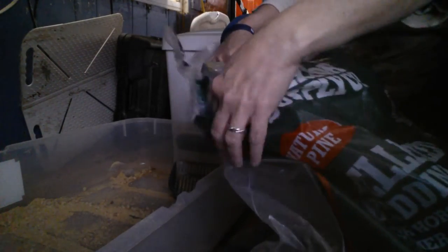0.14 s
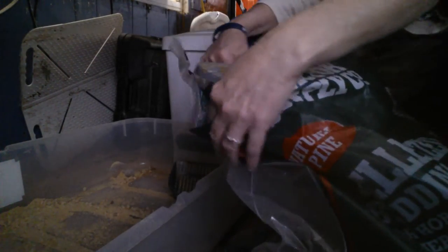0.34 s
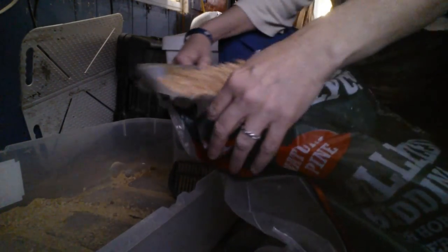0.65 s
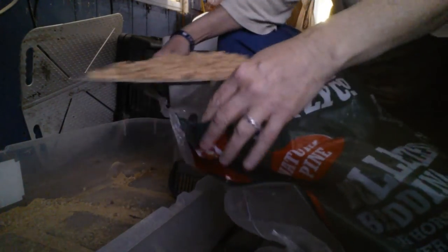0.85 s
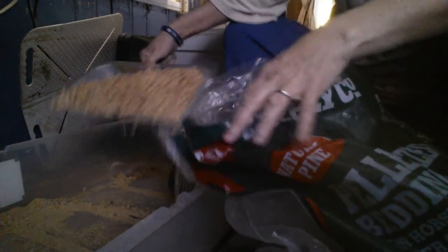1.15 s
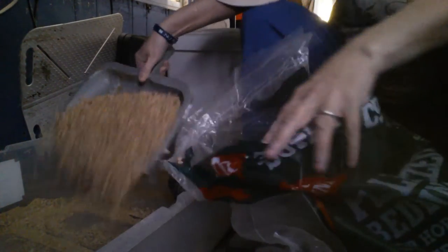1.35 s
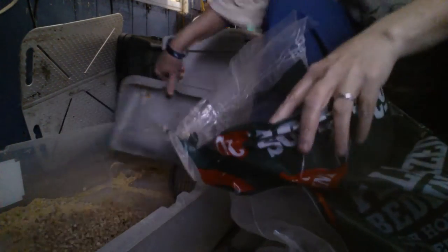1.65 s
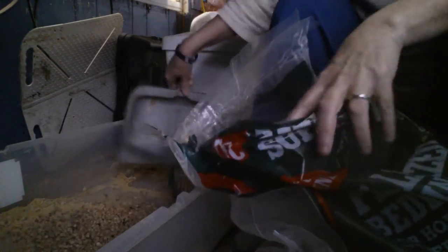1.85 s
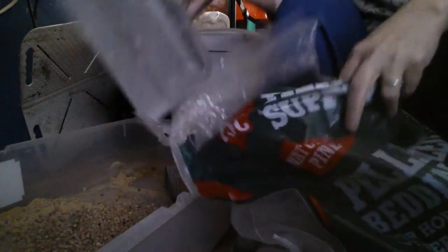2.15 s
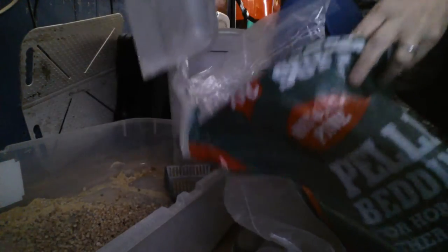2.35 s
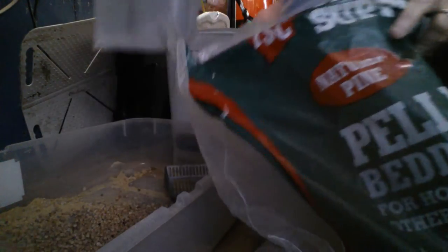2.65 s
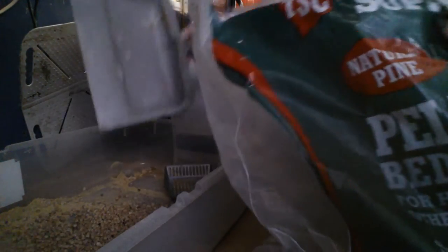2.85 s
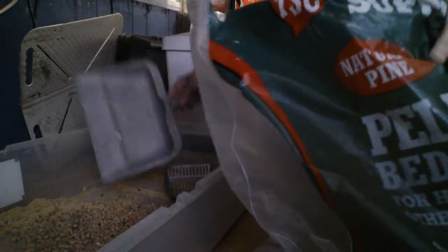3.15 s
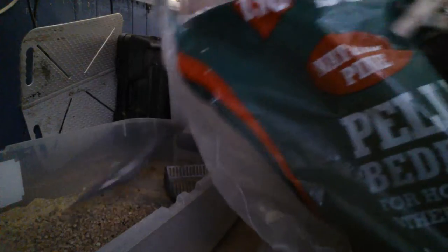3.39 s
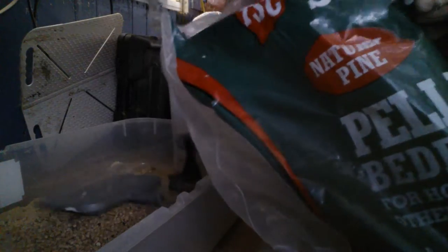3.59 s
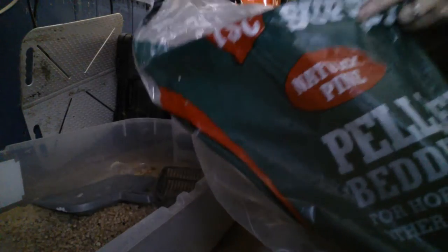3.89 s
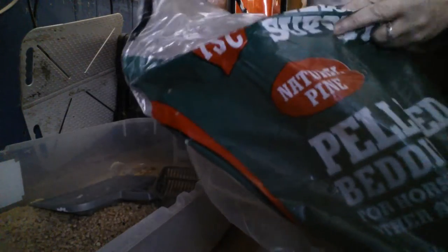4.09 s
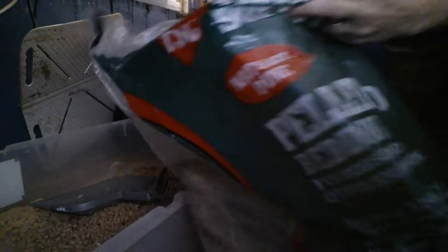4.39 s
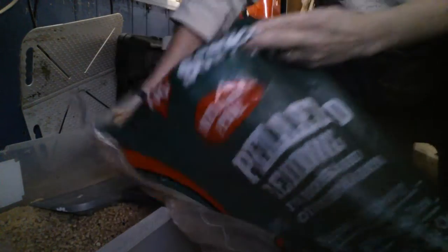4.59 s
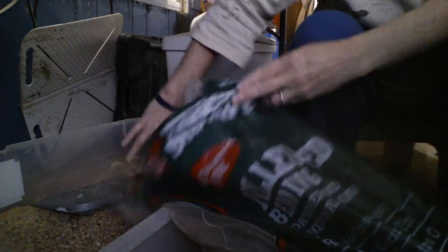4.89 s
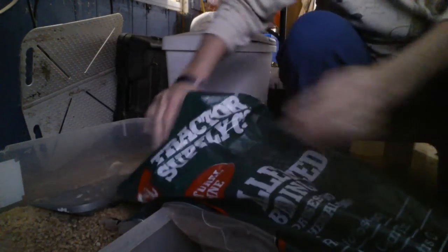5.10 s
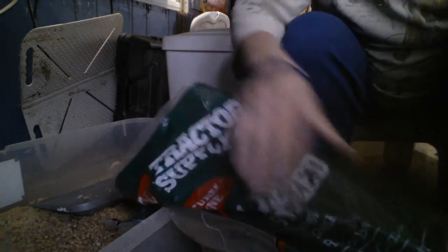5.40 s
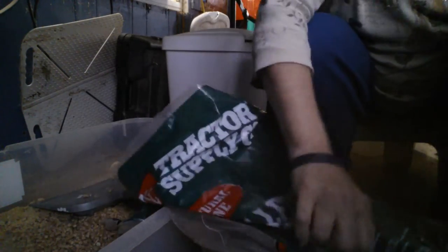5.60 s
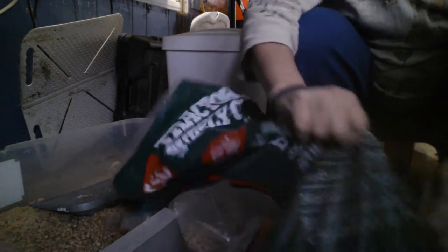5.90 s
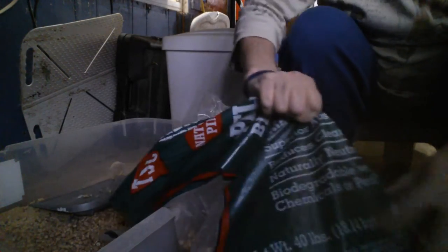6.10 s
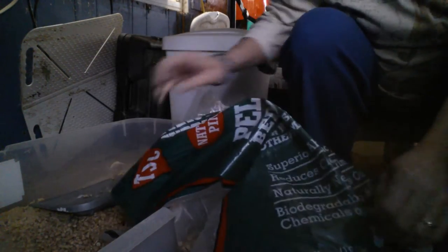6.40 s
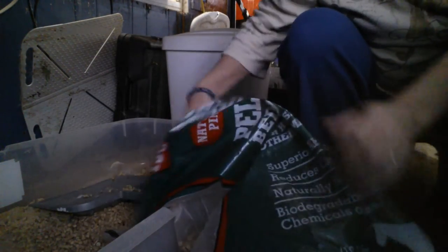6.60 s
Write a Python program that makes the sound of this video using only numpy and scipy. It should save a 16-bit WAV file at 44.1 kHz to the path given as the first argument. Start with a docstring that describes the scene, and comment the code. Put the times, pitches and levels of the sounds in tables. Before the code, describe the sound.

Stiff plastic crinkles with low shifting weight beneath it. Quick scoop clacks lead to a dense, gritty burst of wood pellets striking each other and ringing a plastic tub. After softer rustling, a thump and a cluster of bumps land in the tub; the bag then swishes and crackles strongly, lets out a smaller rush of pellets, and is scrunched in sharp bursts. Close stereo pickup indoors, short dry reverberation, a brighter right side, low quiet room hum.

```python
"""Wood pellets are scooped from a crinkling plastic bag and poured into a plastic bin, close up in a small room.
The bag crinkles while the scoop digs; the scoop clacks, and a scoopful rattles into the ringing bin.
The bag is then gripped, lifted and swung over the bin, where the scoop drops; it is tipped, spills and is crumpled.
Filtered random impulses make bag and pellets, decaying sines the bin, and filtered noise the room and its drone.
The two microphone ports resonate at different pitches, so the highest fizz sits on the right."""
import sys
import numpy as np
from scipy import signal
from scipy.fft import rfft, irfft
from scipy.io import wavfile
from scipy.ndimage import uniform_filter1d

SR = 44100
rng = np.random.default_rng(int(sys.argv[2]) if len(sys.argv) > 2 else 0)


def int16_out(signal):
    """Quantize to a 16-bit WAV file."""
    q = np.round(np.clip(np.atleast_2d(signal).T, -1, 1) * 32767)
    wavfile.write(sys.argv[1], SR, q.astype(np.int16))


N = 297498
TIME = np.arange(N) / SR


# each grip, lift or push of the bag; holds count from the start, levels are before the gains in bag():
# start t/s, hold t/s, crinkle of small creases level/dB, rustle of wide folds level/dB, rumble of the load level/dB
BAG_STROKES = [ (-0.02, 0.2, -43.5, -39.5, -45), (0.18, 0.13, -35, -37.5, -43),
               (0.39, 0.25, -33.5, -35.5, -40.5), (0.575, 0.12, -36, -30, -33.5),
               (0.71, 0.27, -36.5, -34.5, -39), (1.03, 0.069, -31.5, -33, -40),
               (1.23, 0.24, -37.5, -42, -39.5), (1.78, 0.089, -45, -43, -51), (2.25, 0.14, -42, -47, -56),
               (2.42, .15, -39.5, -44.5, -48), (2.66, 0.12, -40.5, -43.5, -51),
               (2.75, 0.09, -34.5, -38, -41.5), (2.88, 0.39, -44.5, -39, -43.5),
               (3.31, 0.044, -34, -32, -36), (3.455, 0.099, -33.5, -36.5, -44),
               (3.52, 0.38, -31, -35.5, -42), (3.96, 0.047, -36, -41.5, -35),
               (4.08, 0.28, -43.5, -37.5, -36.5), (4.27, 0.12, -30.5, -26, -33.5),
               (4.35, .16, -22.5, -21.5, -30), (4.555, 0.18, -22, -22.5, -30),
               (4.74, 0.11, -31, -29.5, -39.5), (4.9, 0.18, -39, -40, -43), (5.31, 0.12, -35.5, -37, -42),
               (5.47, 0.19, -34.5, -45.5, -43), (5.63, 0.14, -30.5, -44, -43.5),
               (5.735, 0.14, -25.5, -38.5, -35.5), (5.85, 0.22, -27.5, -30.5, -35),
               (6.07, .13, -40, -36, -39), (6.23, 0.061, -30, -34.5, -40), (6.27, 0.1, -25.5, -34, -36),
               (6.39, 0.032, -40, -34, -37), (6.62, .08, -35, -44, -48), (6.69, .06, -28.5, -30.5, -38)]
# the bag between strokes: crinkle level/dB, rustle level/dB, rumble level/dB, before the same gains
BAG_AT_REST = (-48.5, -49, -53)


def handling():
    """Amplitude modulation: how hard creases, folds and load are worked over time."""
    return [envelope(BAG_STROKES, axis=2 + k, attack_s=0.02, fade_db_per_s=162, rest_db=rest)
            for k, rest in enumerate(BAG_AT_REST)]


# spectrum of a small crease: f/Hz, level/dB
CREASE_SPECTRUM = [(200, -32), (700, -7.5), (1500, -6.5), (3000, 2.5), (6000, 1.5), (10000, -2),
                   (16000, -2.5)]
# spectrum of a wide fold: f/Hz, level/dB
FOLD_SPECTRUM = [(120, -7), (260, 2.5), (400, -7.5), (520, 0.5), (700, 2.5), (950, -6.5), (1500, -3),
                 (2500, -1.5), (5000, -9.5), (12000, -15.5)]
# spectrum of the shifting load of pellets: f/Hz, level/dB
LOAD_SPECTRUM = [(30, -9.5), (55, -9.5), (85, -4), (130, -1), (170, -3.5), (230, -2), (330, -17.5),
                 (600, -21), (2000, -82)]


def bag(crease_db=0, fold_db=-3, load_db=2):
    """Crackling noise: small creases crackle, wide folds rustle and the load shifts with a low rumble."""
    creases = grains(per_s=1500, spread_db=3.3, clump_db=2.5, spectrum=CREASE_SPECTRUM,
                     decay_s=0.0073, direct=0.24)
    folds = grains(per_s=500, spread_db=4.5, clump_db=2.5, spectrum=FOLD_SPECTRUM,
                   decay_s=0.0098, direct=0.47, tint_db=6.0)
    load = grains(per_s=130, spread_db=5.5, clump_db=1.0, spectrum=LOAD_SPECTRUM,
                  decay_s=0.018, direct=0.46, size=4096)
    crinkle, rustle, rumble = handling()
    return amp(crease_db) * crinkle * creases + amp(fold_db) * rustle * folds + amp(load_db) * rumble * load


# the loudest creases snapping; levels are before the offsets in cracks() and snaps():
# t/s, overall level/dB, body level/dB, crispness level/dB
LOUD_SNAPS = [(0.05, -21.5, -6, -9), (0.185, -21, -20, -3), (0.202, -17, -28, 3), (0.315, -28, -11, -20),
              (0.597, -13.5, -37, -3), (0.621, -19, -10, -1), (0.703, -19.5, -18, -10),
              (0.906, -11.5, -22, -3.5), (1.036, -16, -13, -13), (1.051, -8.5, -17.5, -4),
              (1.308, -20, -14, -12), (1.487, -9, -16, -8), (1.796, -17.5, -24, 3), (1.903, -25, -23, -42),
              (2.262, -24, -23, -2), (2.382, -27.5, -8, -4), (2.439, -25, -9, 1.5),
              (2.565, -21.5, -22, -14), (2.667, -23, -12.5, -4), (2.838, -19, -15, -8),
              (2.893, -19.5, -6.5, -6), (3.013, -25, -16, -30), (3.048, -21.5, -16, -6),
              (3.134, -26, -15, -12), (3.195, -27.5, -6, -33), (3.32, -24, -3, -22), (3.451, -13, -12, 0),
              (3.509, -16.5, -6, -2), (3.532, -9, -8, -11), (3.582, -6.5, -13, -6), (3.669, -13, -36, -4.5),
              (3.885, -16, -32, -12), (3.918, -12.5, -18, -7), (3.967, -19.5, -19, -3),
              (4.095, -23.5, -23, -3), (4.293, -28, -20, -1), (4.893, -7, -14.5, -8.5),
              (4.911, -15, -22, -21), (4.941, -7, -12, -2), (4.953, -10.5, -19, -5.5), (5.098, -15, -20, 0),
              (5.117, -14, -18, 0), (5.165, -16.5, -10, -23), (5.205, -17, -17, -28), (5.396, -15, -13, -8),
              (5.425, -19.5, -16.5, -11), (5.509, -21, -12, -4), (5.561, -19.5, -34, 4),
              (5.655, -15, -16, 1), (5.777, -16, -22, 6), (5.79, -15.5, -28, 7), (5.826, -13, -27, 5),
              (5.937, -14, -16, 3), (5.972, -11, -16, -5), (6.105, -13, -31, -5), (6.154, -12, -16, -6),
              (6.17, -13, -11, -3), (6.388, -16.5, -28, -3), (6.53, -29, 1, -2), (6.72, -14, -11, -18)]


def snap_rows(per_s=12, tint_db=3, snap_s=0.014):
    """Poisson process: small random snaps, stronger with the crinkling, join the loud ones."""
    crinkle_db = 20 * np.log10(handling()[0])
    growth = 0.69  # dB of snap for each dB of crinkle
    at = np.flatnonzero(rng.random(N) < per_s / SR)
    strays = []
    for i in at:
        a, b, c = rng.standard_normal(3)
        level = growth * crinkle_db[i] - 4.5 + 4 * a
        body, crisp = -21.5 + tint_db * b, -18 + tint_db * c
        strays.append((i / SR, level, body, crisp))
    return [(*row, snap_s) for row in list(LOUD_SNAPS) + strays]


def snaps():
    """Buckling: a crease gives way in a run of slips that holds, then stops."""
    return cracks(snap_rows(), gain_db=-9.0, first_share=0.12, sustain=1.5)


# pellets running into the bin; holds count from the start, levels are before the gains in pellets():
# start t/s, hold t/s, rattle level/dB, bin ringing level/dB
# rows: a trickle, the whole scoopful, stragglers; then a spill from the bag, the rest of it, a trickle
PELLET_POURS = [(1.3, 0.49, -28, -38.5), (1.524, 0.2, -16, -27.5), (1.78, 0.044, -35, -37),
                (4.893, .05, -23.5, -35), (4.94, 0.18, -19, -34.5), (5.12, 0.17, -27.5, -45.5)]
# spectrum of pellets striking each other: f/Hz, level/dB
PELLET_SPECTRUM = [(200, -45), (420, -23), (800, -11), (1200, -3.5), (1750, -2.5), (2300, -0.5), (4000, 2),
                   (7000, -1), (10000, -6), (16000, -7)]


def pellets(rattle_db=-3, ring_db=-1, count=6):
    """Granular impact noise: pellets strike each other and their landings excite the bin's modes."""
    rattle = grains(per_s=2500, spread_db=3.0, clump_db=1.5, spectrum=PELLET_SPECTRUM,
                    decay_s=0.0056, direct=0.3, size=1024)
    landings = (rng.random((count, 1, N)) < 250 / SR) * rng.standard_normal((count, 1, N))
    rings = [signal.oaconvolve(spot, bin_ring(damping=2.0), axes=1)[:, :N] for spot in landings]
    ring = evened(sum(rings))
    flow = envelope(PELLET_POURS, axis=2, attack_s=0.0071, fade_db_per_s=229)
    landed = envelope(PELLET_POURS, axis=3, attack_s=0.1, fade_db_per_s=196)
    return amp(rattle_db) * flow * rattle + amp(ring_db) * landed * ring


# modes of the bin walls, before random detuning and damping: f/Hz, level/dB, undamped t60/s
WALL_MODES = [(525, -3.5, 0.077), (529, 5, 0.075), (694, 0.5, 0.045), (863, -9.5, 0.12), (1196, -15, 0.13),
              (1486, -29, 0.035), (1720, -8, 0.075), (1770, 9, 0.022), (2550, -1, 0.092)]


def bin_ring(damping, detune=0.04, size=8192):
    """Modal synthesis: one blow rings the walls; pitch and strength of each mode vary at random."""
    t = np.arange(size) / SR
    apart = np.array([[0], [1]])  # each mode reaches the two microphones a little apart
    ring = 0
    for hz, db, t60 in WALL_MODES:
        decay = amp(db + rng.normal(0, 3.0) - 60 * damping * t / t60)
        pitch = hz * rng.normal(1, detune)
        ring = ring + decay * np.sin(2 * np.pi * pitch * (t + apart * rng.normal(0, 0.00015)))
    return ring


# blows on the bin and its bed of pellets, before the gains in thuds():
# t/s, boom level/dB, wall level relative to the boom/dB
BIN_BLOWS = [(0.167, -36.5, -16), (0.31, -39.5, 0.5), (0.407, -34.5, -10), (0.486, -37.5, -0.5),
             (1.125, -39, -0.5), (3.345, -25.5, 0), (3.355, -18.5, -12), (3.534, -26, -12),
             (3.556, -16.5, -5.5), (3.586, -19.5, -4.5), (3.632, -22, -22), (3.672, -25, -5.5),
             (3.733, -29, -19), (3.784, -22.5, -7.5), (3.83, -33, -21), (3.899, -21.5, -7.5),
             (3.95, -24, -14), (4.119, -26.5, -29), (4.382, -28, -9), (4.743, -27, -11),
             (5.649, -29.5, -13.5), (6.05, -41.5, 5), (6.234, -26, -20), (6.35, -21.5, -13)]
# spectrum of the boom: f/Hz, level/dB
BOOM_SPECTRUM = [(30, -27), (60, -17), (80, 0), (110, -4.5), (140, 0), (175, -9), (230, -9.5), (350, -20.5),
                 (700, -26), (3000, -66)]
# slow modes of the bin's floor, before random detuning: f/Hz, level/dB, t60/s
FLOOR_MODES = [(80.6, -1, 0.13), (121.4, 5.5, 0.08), (142, -14, 0.13)]


def thuds(boom_db=-4, floor_db=-4, wall_db=0, clatter_db=-4, boom_s=0.043):
    """Impact excitation: scoop and bag make the floor boom, the walls ring and the pellets clatter."""
    out = np.zeros((2, N))
    t = np.arange(8192) / SR
    clatter_spectrum = [(200, -12.0), (550, -5), (1400, -1), (3000, -12.0), (9000, -24)]
    for s, db, wall in BIN_BLOWS:
        boom = colour(tick(boom_s, 0.99, size=8192), BOOM_SPECTRUM)
        floor = sum(np.sin(2 * np.pi * hz * rng.normal(1, 0.07) * t) * amp(mode_db - 60 * t / t60)
                    for hz, mode_db, t60 in FLOOR_MODES)
        walls = bin_ring(damping=2.4)
        clatter = colour(tick(0.015, 0.25), clatter_spectrum)
        parts = ((boom, boom_db), (floor[None], floor_db),
                 (walls, wall + wall_db), (clatter, wall + clatter_db))
        for part, part_db in parts:
            # the bed of pellets softens the blow
            soft = part * (1 - np.exp(-t[:part.shape[1]] / 0.0028))
            onset_rms = np.sqrt(np.mean(soft[:, :SR // 50] ** 2))  # first 20 ms
            add(out, s, amp(db + part_db) * soft / onset_rms)
    return out


# the scoop clacking against bag and bin; levels are before the offsets in cracks() and clacks():
# t/s, overall level/dB, body level/dB, crispness level/dB, decay t/s
SCOOP_CLACKS = [(1.014, -10.5, -27, -9.5, 0.00051), (1.092, -11, -14, -12, 0.0029),
                (1.147, -15.5, -33, -1, 0.0022), (1.181, -20, -29, -9, 0.0023),
                (1.1975, -10, -12, -8.5, 0.0062), (1.244, -9, -8, -26, 0.0039), (1.278, -9, -11, -24, .004),
                (1.353, -24, -32, 2, .002), (1.461, -11.5, -8.5, -19, 0.0068),
                (1.990, -21.5, -9.5, -7, 0.0065), (3.345, -10, -24, -22, 0.0036)]


def clacks():
    """Contact chatter: the hard scoop meets plastic in a first crack and a run of slips."""
    return cracks(SCOOP_CLACKS, gain_db=-7.0, first_share=0.24, sustain=0.64, scatter_db=-10, scatter_s=0.015)


# pellets sliding over each other inside the bag; holds count from the start, level is before slide_db:
# start t/s, hold t/s, level/dB
PELLET_SLIDES = [(0.47, .24, -43), (3.53, 0.04, -22.5), (3.61, 0.23, -33.5), (3.89, 0.055, -33),
                 (4.2, 0.17, -34.5), (4.33, 0.2, -26), (4.63, 0.064, -20), (5.86, 0.2, -35),
                 (6.33, 0.07, -34)]
# spectrum of the slides, muffled by the bag: f/Hz, level/dB
SLIDE_SPECTRUM = [(120, -26.5), (250, 3), (420, -2.5), (700, -1.5), (1100, -6), (1600, -0.5), (2300, -6),
                  (3500, -0.5), (10000, -60)]


def slides(slide_db=-4):
    """Granular friction: pellets tumble in lumps behind the plastic sheet, which dulls the treble."""
    tumbling = envelope(PELLET_SLIDES, axis=2, attack_s=0.068, fade_db_per_s=124)
    grit = grains(per_s=450, spread_db=4, clump_db=2.0, spectrum=SLIDE_SPECTRUM,
                  decay_s=0.0053, direct=0.31, tint_db=5.5)
    return amp(slide_db) * tumbling * grit


def room(x, t60=0.3, size=16384):
    """Reverberation: convolution with decaying diffuse noise gives a short tail from the cluttered room."""
    t = np.arange(size) / SR
    tail = diffuse(size) * amp(-60 * t / t60) * (1 - np.exp(-t / 0.00097))
    tail = colour(tail, [(100, -1.5), (3000, -1), (15000, -11.0)])
    return signal.oaconvolve(x, tail / np.linalg.norm(tail[0]), axes=1)[:, :N]


# spectrum of the room's drone: f/Hz, level/dB
DRONE_SPECTRUM = [(20, -35), (35, -11), (44, 5), (56, -23), (85, 1), (150, -25), (400, -21), (1500, -33),
                  (6000, -56), (16000, -51)]


def room_tone(tone_db=-50):
    """Stationary diffuse field: filtered noise makes the room's low steady drone."""
    return amp(tone_db) * evened(colour(diffuse(N), DRONE_SPECTRUM, size=16384))


def cracks(rows, gain_db, first_share, sustain, body_db=8, crisp_db=0, scatter_db=-14, scatter_s=0.043):
    """Stick-slip: a first crack and a run of tiny slips that dies away; bag and bin scatter the sound."""
    out = np.zeros((2, N))
    t = np.arange(2048) / SR
    share = np.clip(first_share, 0, 1)
    for s, db, body, crisp, length in rows:
        slips = rng.standard_normal(len(t)) * (rng.random(len(t)) < 4000 / SR)
        run = slips * np.exp(-(t / length) ** sustain)
        run = (1 - share) * run / (np.linalg.norm(run) + 1e-9) + share * (t == 0)
        response = tick(0.0015, 0.89) + amp(scatter_db) * tick(scatter_s, 0)
        crack = signal.fftconvolve(run[None], response, axes=1)
        low, high = body + body_db, crisp + crisp_db
        spectrum = [(100, low - 14), (550, low - 1), (1400, low - 2), (4000, 0), (9000, high), (16000, high - 2)]
        crack = colour(crack, spectrum, size=1024)
        onset_rms = np.sqrt(np.mean(crack[:, :SR // 200] ** 2))  # first 5 ms
        add(out, s, amp(db + gain_db) * crack / onset_rms)
    return out


def grains(per_s, spread_db, clump_db, spectrum, decay_s, direct, tint_db=3, count=40, size=2048):
    """Shot noise: clumped clicks of uneven size, from many spots that each have a tint of their own."""
    sizes = amp(spread_db * np.minimum(rng.exponential(1, N), 3) + clump_db * avalanches())
    spots = []
    for _ in range(count):
        tinted = [(hz, db + tint_db * rng.standard_normal()) for hz, db in spectrum]
        spots.append(evened(colour(tick(decay_s, direct, size), tinted, size)))
    spot = rng.integers(0, count, N)
    out = np.zeros((2, N))
    for i in np.flatnonzero(rng.random(N) < per_s / SR):
        add(out, i / SR, sizes[i] * spots[spot[i]])
    # level the local power, so that the envelopes set the loudness
    power = uniform_filter1d((out ** 2).mean(0), size=4000)
    return out / np.sqrt(abs(power) + 1e-9)


def avalanches(per_s=70, fade_s=0.036):
    """Self-excitation: one slip sets off others in bursts that start at once and die away."""
    starts = rng.exponential(1, N) * (rng.random(N) < per_s / SR)
    activity = signal.lfilter([1], [1, -np.exp(-1 / (fade_s * SR))], starts)
    return 2 * np.tanh(evened(activity - activity.mean()) / 2)


def tick(decay_s, direct, size=4096):
    """Impulse response: one click from a random direction and its dense scatter from nearby plastic."""
    t = np.arange(size) / SR
    out = diffuse(size) * np.exp(-t / max(decay_s, 1 / SR))
    out /= np.linalg.norm(out[0])
    out[[0, 1], rng.integers(0, 10, 2)] += direct  # a delay of its own at each microphone
    return out


def diffuse(size, spacing_m=.13):
    """Diffuse-field coherence: two spaced microphones agree in the bass and differ in the treble."""
    a, b = rfft(rng.standard_normal((2, size)))
    sound_speed = 343  # m/s
    same = np.sinc(2 * np.fft.rfftfreq(size, 1 / SR) * spacing_m / sound_speed)
    return irfft(np.array([a, same * a + np.sqrt(1 - same ** 2) * b]), size)


def colour(x, points, size=4096):
    """Minimum-phase filtering: a causal filter with the given spectrum, f/Hz and level/dB."""
    hz, db = np.transpose(points)
    log_hz = np.log(abs(np.fft.fftfreq(size, 1 / SR)) + 1)
    log_gain = np.log(amp(np.interp(log_hz, np.log(hz), db)))
    # the Hilbert transform of the log gain supplies the phase
    taps = np.fft.ifft(np.exp(np.conj(signal.hilbert(log_gain)))).real[:size // 2]
    return signal.oaconvolve(x, taps[None], axes=1)[:, :x.shape[1]]


def envelope(rows, axis, attack_s, fade_db_per_s, rest_db=-np.inf):
    """Exponential decay: each row rises, holds at the dB in the given column and fades; the largest wins."""
    t = np.arange(0, N / SR, 1 / 1000)
    gains = []
    for row in rows:
        rise = np.clip((t - row[0]) / attack_s, 0, 1)
        fade_db = fade_db_per_s * np.maximum(t - row[0] - row[1], 0)
        gains.append(rise * amp(row[axis] - fade_db))
    return np.interp(TIME, t, np.maximum(np.max(gains, axis=0), amp(rest_db)))


def amp(db):
    """Logarithmic level: decibels to amplitude gain."""
    return 10 ** (np.asarray(db) / 20)


def evened(x):
    """Power normalization: scales to an rms of one."""
    return x / np.sqrt(np.mean(x ** 2) + 1e-20)


def add(mix, s, sound):
    """Superposition: mixes a sound in at time s."""
    part = mix[:, max(round(s * SR), 0):][:, :sound.shape[1]]
    part += sound[:, :part.shape[1]]


def scene(room_db=-14):
    """Superposition: all the handling, the room's answer and its drone."""
    near = bag() + snaps() + pellets() + thuds() + clacks() + slides()
    return near + amp(room_db) * room(near) + room_tone()


# response of the left microphone port: f/Hz, level/dB
LEFT_RESPONSE = [(60, -2), (200, -4.5), (600, -1), (1300, 1), (2400, -1), (3600, -2.5), (4750, 8),
                 (5600, 3), (6800, -4), (8200, -9.5), (12000, -13), (15000, -11)]
# response of the right microphone port: f/Hz, level/dB
RIGHT_RESPONSE = [(60, -2), (200, -0.5), (600, 6), (1300, 7), (2400, 1.5), (4700, 0), (5300, 1), (7600, 4),
                  (9000, 10), (10100, 16), (11000, 10), (12200, 3.5), (15000, -3.5)]


def record(dry, low_cut_hz=36, edge_hz=15500):
    """Port resonance: each port colours its channel; then the low cut, full scale and the band limit."""
    ports = np.vstack([colour(dry[:1], LEFT_RESPONSE), colour(dry[1:], RIGHT_RESPONSE)])
    low_cut = signal.butter(6, low_cut_hz / (SR / 2), "high", output="sos")
    ports = signal.sosfilt(low_cut, ports)
    edge = signal.firwin(301, edge_hz, window=("kaiser", 8), fs=SR)
    return signal.oaconvolve(np.clip(ports, -1, 1), edge[None], "same", axes=1)


dry = scene()
out = record(dry)
int16_out(out)
```